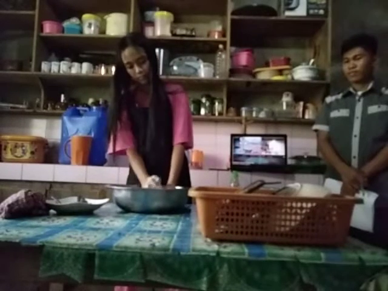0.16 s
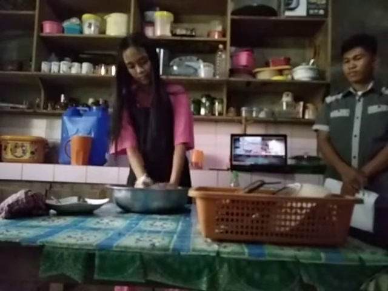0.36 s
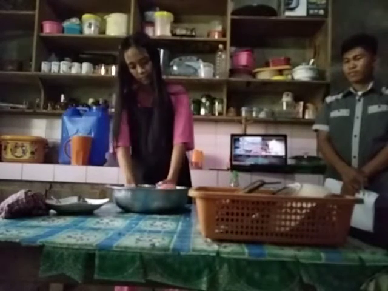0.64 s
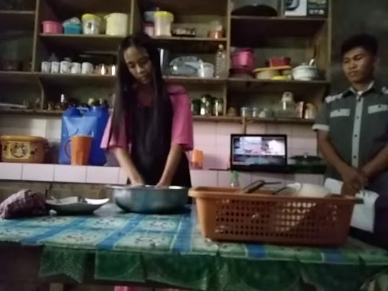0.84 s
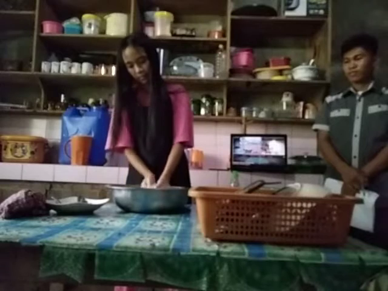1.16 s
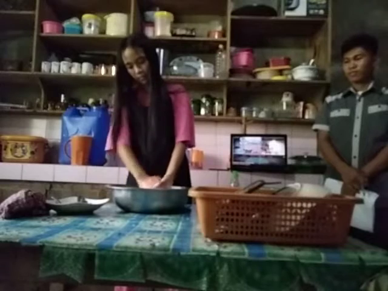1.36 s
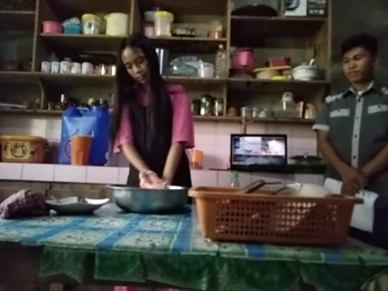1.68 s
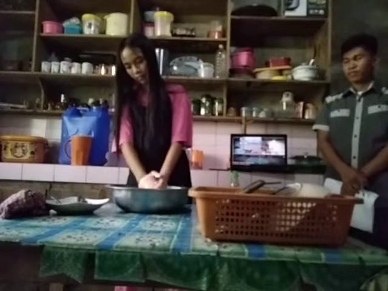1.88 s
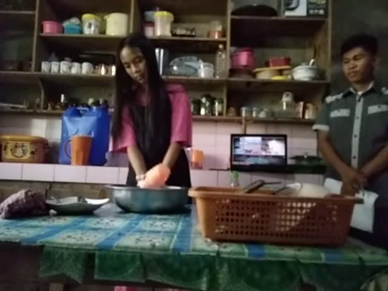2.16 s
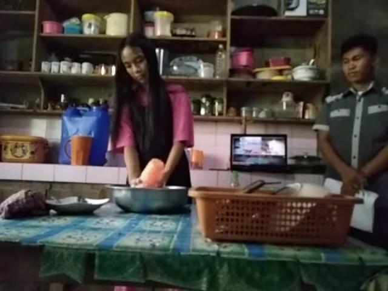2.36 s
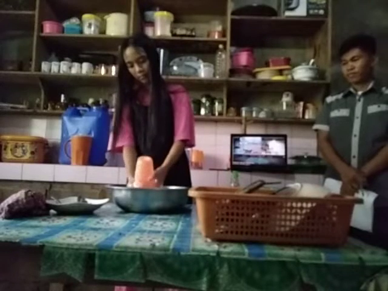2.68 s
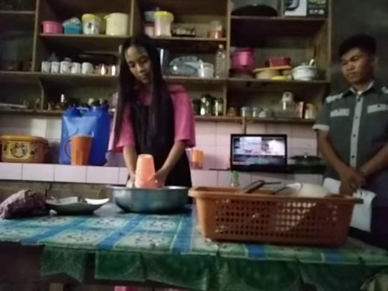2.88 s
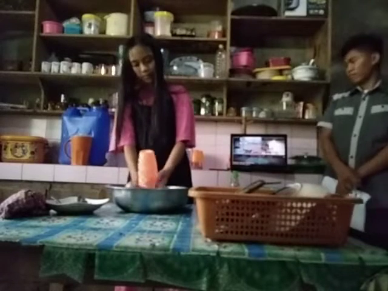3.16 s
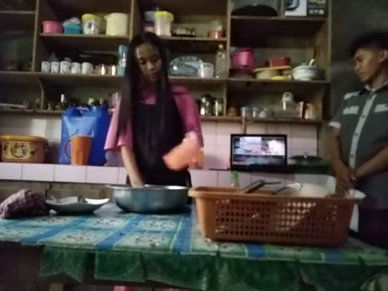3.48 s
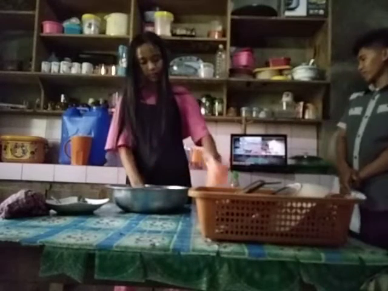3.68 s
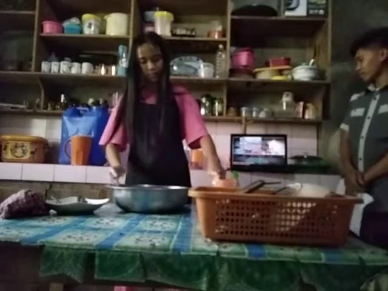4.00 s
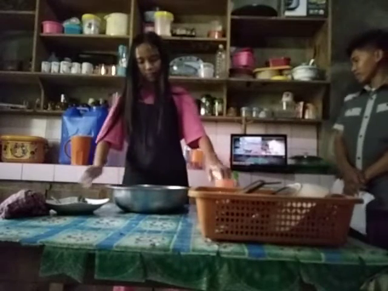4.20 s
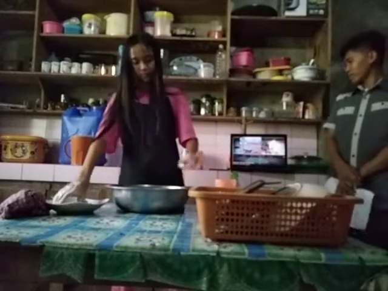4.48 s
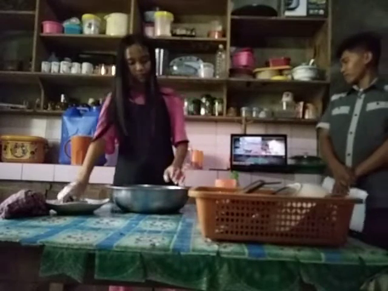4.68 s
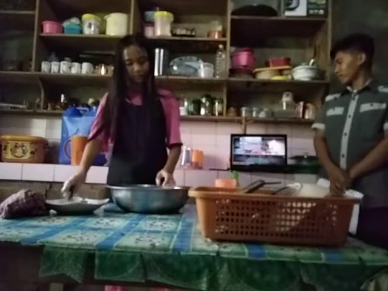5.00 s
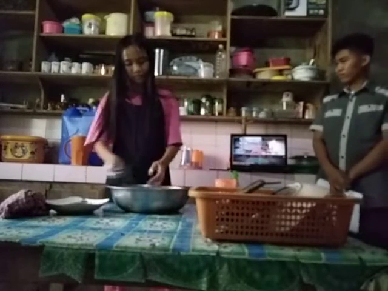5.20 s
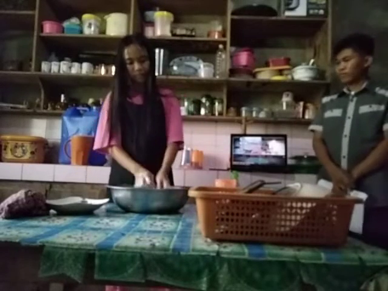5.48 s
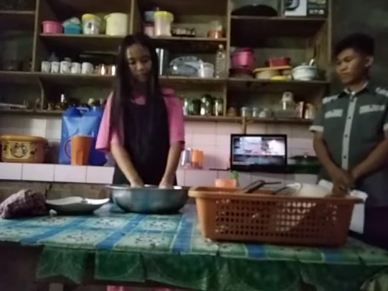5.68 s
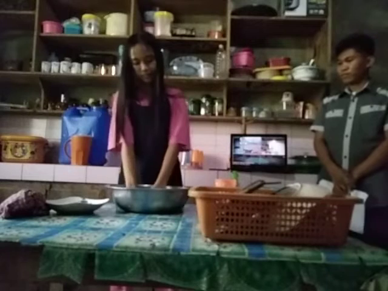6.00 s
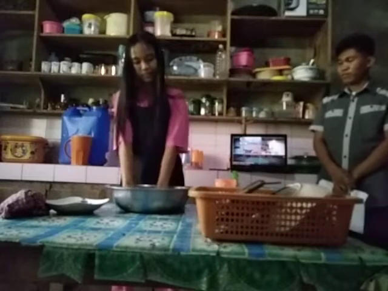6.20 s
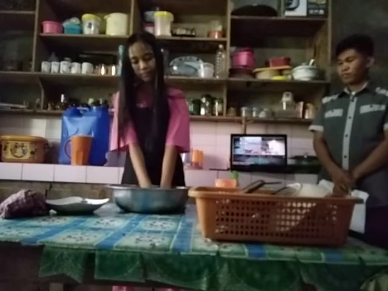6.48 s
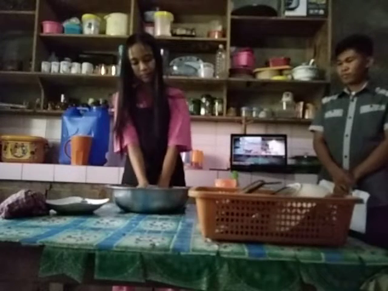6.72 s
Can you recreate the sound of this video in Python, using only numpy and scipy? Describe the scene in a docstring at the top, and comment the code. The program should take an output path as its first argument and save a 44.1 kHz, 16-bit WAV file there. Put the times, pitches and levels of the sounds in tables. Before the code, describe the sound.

A small kitchen with hard walls, heard through one fixed microphone a little way off. A soft low motor drone near 73 Hz, patchy low air noise and faint hiss continue throughout. From 0 to 0.75 s a gecko gives five quiet, rough chirps, about six a second. A wet plastic cup knocks dull and hollow in a steel basin at 0.7 and 0.83 s, then at 1.2 s, with a faint bump at 1.36. From 1.5 to 3.8 s it is nearly quiet, with only very weak bumps and tiny pips. A hollow cup knock comes at 3.9 s. At 4.55-4.95 s cutlery clatters onto plates in a bright, dense, ringing burst, the loudest moment, mixed with steel drags. Spoons drop crisply in the basin around 5.45 s. A faint bump and scrape follow at 5.75, then cup knocks with hard rim taps and light scrapes at 6.1 and 6.4 s, fading to quiet.

```python
"""A plastic cup knocks in a steel basin in a hard-walled kitchen: each blow is a set of short resonances.
Cutlery clatters off plates and spoons drop in the basin as noisy cracks over ringing modes; drags are shaped noise.
A gecko chirps in rough narrow bands near the start; narrow noise pips, mostly faint, are scattered throughout.
Behind lie a far motor of four sine partials, thin tones and patchy noise. Hits and drags get an answer from the walls.
Levels are set ahead of a 2 dB output trim."""
import sys
import numpy as np
from scipy import signal
from scipy.fft import rfft, irfft, next_fast_len
from scipy.io import wavfile
from scipy.ndimage import uniform_filter1d, map_coordinates

SR = 44100
rng = np.random.default_rng(int(sys.argv[2]) if len(sys.argv) > 2 else 0)


def store_wav(level_fs):
    """Save 16-bit WAV to argv[1]."""
    pcm = np.round(np.clip(np.atleast_2d(level_fs), -1, 1) * 32767)
    wavfile.write(sys.argv[1], SR, pcm.T.astype(np.int16))


N = 302085  # samples in the scene
LONG = 2 ** 15  # samples in one hit or room answer
HIT_T = np.arange(LONG) / SR
HIT_HZ = np.fft.rfftfreq(LONG, 1 / SR)


# Cup blows, hollow and thump relative to the wall modes:
# start_s, level_db, thump_db, thump_hz, hollow_hz, hollow_db
CUP_KNOCKS = [(0.026, -46.5, -25, 122, 608, 6), (0.054, -52.5, -12, 121, 534, 18),
              (0.69, -35, -9.5, 406, 733, 5.5), (0.831, -29.5, -13.5, 375, 653, 2),
              (1.185, -33, 6, 145, 555, 2), (1.358, -46, 11, 245, 557, 14.5),
              (2.362, -52.5, 7.5, 127, 630, -1.5), (2.637, -55.5, 16.5, 225, 802, 20),
              (2.785, -53, 5, 230, 1080, -4.5), (3.243, -60, 28, 153, 519, 5.5),
              (3.907, -31.5, 1.5, 354, 566, 17.5), (4.7, -42, 12.5, 323.5, 577, -3.5),
              (5.753, -48.5, -6.5, 222, 451, 0.5), (6.107, -35.5, -2.5, 343, 645, 3),
              (6.373, -39.5, -32, 137, 1092, 9)]
# Modes of the cup wall: pitch_hz, width_hz, level_db
CUP_MODES = [(399, 75, -11), (432, 26, -2.5), (562, 29, 7), (686.4, 4, 5), (765.5, 65, -13.5),
             (888, 280, -7), (1089, 112, -8.5)]
# Hard taps of the rim: start_s, level_db, treble_db, high_mode_db, low_modes_db, top_modes_db
RIM_TAPS = [(1.1819, -46, -37, -9, -6.5, -4), (2.7852, -35, -5, 11, 10, 0.5),
            (6.1034, -31.5, -17.5, -9, -2, -18), (6.3719, -38.5, -13, -22.5, 9, -16)]
# Low modes of the rim: pitch_hz, width_hz, level_db
RIM_LOW_MODES = [(1092, 157, 0.5), (2053, 98, -6.5), (2550, 370, -2.5)]
# Top modes of the rim: pitch_hz, width_hz, level_db
RIM_TOP_MODES = [(5150, 950, -2), (6870, 750, -5), (7830, 490, -1.5)]


def cup():
    """Dull blows excite the wall modes, the air in the cup and a thump; hard taps excite the rim."""
    out = np.zeros(N + LONG)
    soft_contact = 1 / (1 + 1j * HIT_HZ / 1700) ** 4  # wet plastic meets softly: little treble
    for start, level_db, thump_db, thump_hz, hollow_hz, hollow_db in CUP_KNOCKS:
        wall = body(CUP_MODES, HIT_HZ) * peak(HIT_HZ, 800, 1100) ** 2
        hollow = amp(hollow_db) * peak(HIT_HZ, hollow_hz, 73.8) ** 2
        thump = amp(thump_db) * peak(HIT_HZ, thump_hz, 300) ** 3
        add(out, start, level_db, irfft((wall + hollow + thump) * soft_contact), wet_db=3.5)
    for start, level_db, treble_db, high_db, low_db, top_db in RIM_TAPS:
        low = amp(low_db) * rim(RIM_LOW_MODES)
        high = amp(high_db) * peak(HIT_HZ, 3630, 320) ** 2
        treble = amp(treble_db) * peak(HIT_HZ, 5100, 5300) ** 2
        top = amp(top_db) * rim(RIM_TOP_MODES)
        add(out, start, level_db, irfft(low + high + treble + top), wet_db=5.0)
    return out[:N]


def rim(modes):
    """Rim modes as a sum of doubled resonances, which build up less abruptly than single ones."""
    return sum(amp(db) * peak(HIT_HZ, hz, width) ** 2 for hz, width, db in modes)


# Cutlery on plates: start_s, level_db, body_db, ring_db
PLATE_HITS = [(4.565, -43.5, -13.5, 1), (4.582, -15.5, -4.5, -6.2), (4.598, -29.5, -12, -2.5),
              (4.669, -12.5, -24.5, 1.5), (4.6819, -19, 2, 0), (4.7, -20.5, -1.5, 0.5),
              (4.7289, -20.5, -13.5, 1.5), (4.7999, -26, -12, -0.8), (4.9174, -31, -2, -1.5)]
# Colour of a steel contact: frequency_hz, density_db_per_hz
CONTACT_COLOUR = [(240, -65), (400, -23.5), (777, -2.5), (852, -16), (1090, -10.5), (1710, -10.5),
                  (1840, -7.5), (4380, 5.5), (4800, -3.5), (7630, -6.5), (16000, -16.5)]
# Plate modes, t60 as the free ring before its cap and damping: pitch_hz, strength_db, t60_s
PLATE_MODES = [(767, -21.5, .4), (1113, -10, 0.46), (1210, -11, .46), (1395, -17.5, 0.39), (1884, -19, 1.4),
               (3130, -2.5, 0.12), (3320, -5.5, 0.37), (3570, -9.5, 0.36), (3760, -9, 0.62),
               (4410, -0.5, 0.2), (5260, -18, 5.0), (5070, -28, 0.43), (5600, -11.5, 0.34),
               (5800, -8, 0.35), (6260, -3, 0.33), (6960, -14.5, 0.41), (7470, -1, 0.24), (7670, -8, 0.23),
               (8690, -13.5, 0.33), (8900, -23.5, 0.62), (9561, -24.5, 0.84), (10700, -32, 1.2),
               (11850, -9.5, 0.37), (13400, -31.5, 0.96)]


def plates():
    """Cutlery on plates: each contact is a short noisy crack plus a ring of the plate modes."""
    out = np.zeros(N + LONG)
    for start, level_db, body_db, ring_db in PLATE_HITS:
        colour = amp(along(CONTACT_COLOUR, HIT_HZ)) + amp(body_db) * peak(HIT_HZ, 950, 600) ** 2
        plate_ring = amp(ring_db) * ring(PLATE_MODES, damping=0.65, scatter_db=3.0)
        add(out, start, level_db, plate_ring + crack(colour, 0.013, attack=0.0015), wet_db=6)
    return out[:N]


# Spoons dropping in the basin: start_s, level_db
SPOON_DROPS = [(5.434, -34.5), (5.443, -23.5), (5.4557, -28), (5.4811, -30.5)]
# Spoon modes, t60 as the free ring before its cap and damping: pitch_hz, strength_db, t60_s
SPOON_MODES = [(3060, -15, 0.14), (4920, -6.5, .2), (5220, -2.5, 0.22), (5680, -9, .15), (6770, -8.5, 0.33),
               (7330, -4, 0.17), (7430, -19, .2), (8600, -10.5, .2), (9170, -15, .15), (11300, -15, 0.16),
               (11970, -14.5, 0.21), (11200, -12, 0.21)]


def spoons():
    """Spoons dropped in the basin: a bright crack over spoon modes of scattered strength."""
    out = np.zeros(N + LONG)
    for start, level_db in SPOON_DROPS:
        colour = amp(along(SLIDE_COLOUR, HIT_HZ)) + amp(-24.5) * peak(HIT_HZ, 13500, 5000) ** 2
        spoon_ring = 1.2 * ring(SPOON_MODES, damping=1.0, scatter_db=8.0)
        add(out, start, level_db, spoon_ring + crack(colour, 0.025, attack=0.00098), wet_db=7)
    return out[:N]


# Strokes of steel on steel: start_s, rise_s, hold_s, level_db, fade_db_per_s, low_band_db
STROKES = [(4.551, 0.017, 0.072, -37, 199, -3), (4.665, 0.007, .036, -28.5, 288.5, -7),
           (4.75, .02, 0.11, -42.5, 167, -3), (5.738, 0.029, 0.056, -49.5, 297, -27),
           (6.102, 0.0069, 0.023, -40, 470, -9), (6.155, .21, 0.0039, -44.5, 195, -37),
           (6.365, .02, 0.0116, -46.5, 190, -0.5), (6.482, 0.036, 0.0065, -56.5, 272, -36)]
# Colour of sliding steel: frequency_hz, density_db_per_hz
SLIDE_COLOUR = [(1760, -41), (3000, -18), (3220, -18.5), (3600, -11.5), (5670, -1.5), (6440, -5.5),
                (7780, -3.5), (9140, -13), (14900, -33.5), (16000, -44)]
RATTLE_PER_S, RATTLE_DB = 120, -9  # mean rate of tiny knocks, level under the high band


def sliding():
    """Dragged cutlery: gritty noise, coloured by steel and spoon modes, follows each stroke."""
    grit = amp(1.5 * wobble(60) + 2.5 * wobble(350))  # uneven slips
    high = hiss(lambda f: amp(along(SLIDE_COLOUR, f)), patchy_db=2)
    modes = hiss(lambda f: steel(SPOON_MODES, 0.51, 2.1, f), patchy_db=11.5)
    high = unit(grit * (high + 0.13 * modes))
    high = unit(high + amp(RATTLE_DB) * rattle())
    low = unit(grit * hiss(lambda f: peak(f, 2400, 2700) ** 2, patchy_db=1.0))
    out, t = np.zeros(N), np.arange(N) / SR
    for start, rise, hold, level_db, fade, low_db in STROKES:
        fading_s = np.clip(t - start - rise - hold, 0, None)
        stroke = np.clip((t - start) / rise, 0, 1) * amp(level_db - fade * fading_s)
        out += stroke * (high + amp(low_db) * low)
    return out + amp(-5.0) * signal.fftconvolve(out, walls())[:N]


def rattle():
    """Tiny knocks of uneven size at random moments, each a short crack of steel; rms 1."""
    chance, size = rng.random(size=(2, N))
    knocks = (chance < RATTLE_PER_S / SR) * size ** 3
    tick = crack(amp(along(SLIDE_COLOUR, HIT_HZ)), 0.006, attack=0.0002)[:1024]
    return unit(signal.fftconvolve(knocks, tick)[:N])


# Gecko chirps: start_s, level_db, pitch_hz, upper_band_db, middle_bands_db
GECKO_CHIRPS = [(0.0335, -50.5, 2480, -5.5, -24), (0.2094, -51, 2400, 3.5, -32),
                (0.374, -51, 2386, 3.5, -4.5), (0.5443, -52.5, 2234, -13.5, -10.5),
                (0.6888, -55.5, 2193, -7, -10.5)]
THROAT_DB = -6  # two throat lines, the same in every chirp


def gecko():
    """Short rough chirps: a burst of noise through a few narrow bands."""
    out = np.zeros(N + LONG)
    for start, level_db, hz, upper_db, middle_db in GECKO_CHIRPS:
        pitch = peak(HIT_HZ, hz, 133) ** 2
        upper = amp(upper_db) * peak(HIT_HZ, 4966, 270) ** 2
        middle = amp(middle_db) * (peak(HIT_HZ, 3780, 220) ** 2 + peak(HIT_HZ, 4300, 180) ** 2)
        throat = amp(THROAT_DB) * (peak(HIT_HZ, 2687, 98) ** 2 + peak(HIT_HZ, 1642, 63) ** 2)
        colour = pitch + upper + middle + throat
        add(out, start, level_db, crack(colour, 0.057, attack=0.0066), wet_db=3.5)
    return out[:N]


# Single narrow pips: start_s, level_db, pitch_hz
SINGLE_PIPS = [(.695, -71, 6340), (.7, -73, 8660), (0.7194, -69, 2150), (1.5277, -70.5, 5290),
               (1.5794, -71, 4130), (1.8794, -68.5, 2160), (2.289, -71, 2470), (3.3594, -72, 5100),
               (3.8194, -74, 8600), (3.859, -73, 7640), (4.542, -47, 3400), (3.9107, -73.5, 2720),
               (5.2978, -69.5, 2396), (5.3485, -69, 5230), (5.4095, -63.5, 5080), (6.518, -56.5, 4490),
               (6.7994, -64, 4530), (6.804, -76, 9000), (6.812, -73, 7760), (6.816, -63.5, 2910),
               (6.818, -65.5, 3370)]
STRAY_DB, STRAY_HZ = -79.5, 3000  # mean level and middle pitch of the stray pips


def pips():
    """Narrow noise pips at set moments, and 22 faint ones at random moments and pitches."""
    out = np.zeros(N + LONG)
    stray = [(when * N / SR, STRAY_DB + 8 * (size - 0.5), STRAY_HZ * 2.5 ** (pitch - 0.4))
             for when, size, pitch in rng.random(size=(22, 3))]
    for start, level_db, hz in SINGLE_PIPS + stray:
        add(out, start, level_db, crack(peak(HIT_HZ, hz, 140) ** 2, 0.42, attack=0.0044), wet_db=-3.0)
    return out[:N]


# Level of the motor's first partial: time_s, level_db
MOTOR_LEVEL = [(0.0, -52), (0.05, -53), (1.56, -57), (3.3, -60.5), (3.89, -57), (5.02, -60.5), (5.4, -69),
               (5.47, -61.5), (6.6, -58), (6.66, -66), (6.77, -58.5), (6.85, -67)]
# Swells of the upper partials: start_s, length_s, third_db, fifth_db
OVERTONE_SWELLS = [(0.0, 0.95, -81.5, -67.5), (1.0, .56, -72.5, -66), (2.43, 0.57, -64, -84),
                   (2.8, 0.23, -81, -71.5), (3.26, 0.42, -68, -85), (3.68, 0.47, -78, -67),
                   (4.2, 0.752, -87, -65), (5.75, 0.25, -67, -74), (6.1, 0.19, -79.5, -65.5),
                   (6.68, 0.14, -65, -77)]
MOTOR_HZ = 72.73  # mean pitch of the first partial
OCTAVE_DB, OCTAVE_WAVERS_DB = -70, 3  # second partial and its slow wavering
FAINT_DB, FLICKER_DB = -23.5, 2  # third and fifth: floor under the first, quick unevenness
OVERTONE_FADE_S = 0.079


def motor():
    """Four wavering partials of a far motor outside; the third and the fifth come and go."""
    phase = 2 * np.pi * np.cumsum(MOTOR_HZ + 0.5 * wobble(9.5)) / SR
    level_db, = curves(MOTOR_LEVEL)
    flicker = amp(FLICKER_DB * np.array([wobble(18), wobble(16)]))
    third, fifth = (swells(OVERTONE_SWELLS, OVERTONE_FADE_S) + amp(level_db + FAINT_DB)) * flicker
    octave = amp(OCTAVE_DB + OCTAVE_WAVERS_DB * wobble(6.5))
    out = np.zeros(N)
    for k, gain in zip((1, 2, 3, 5), (amp(level_db), octave, third, fifth)):
        wavering = gain * amp(1.2 * wobble(16))
        out += np.sqrt(2) * wavering * np.sin(k * phase + 0.2 * k * wobble(5.8))
    return out


# Centres of the two thin tones: pitch_hz
THIN_HZ = (1686, 2650)
THIN_DB, THIN_WAVERS_DB = (-77.5, -76.5), 3  # start levels, slow wavering
THIN_FADE_DB_S, THIN_END_S = 3.5, 1.27  # fall a second, moment of silence


def thin_tones():
    """Two faint narrow bands of noise that waver and fade out early in the scene."""
    t = np.arange(N) / SR
    fade = amp(-THIN_FADE_DB_S * t) * np.clip((THIN_END_S - t) / 0.18, 0, 1)
    out = np.zeros(N)
    for level_db, hz in zip(THIN_DB, THIN_HZ):
        wavering = amp(level_db + THIN_WAVERS_DB * wobble(2.8))
        out += fade * wavering * hiss(lambda f: peak(f, hz, 150) ** 2, patchy_db=4.0)
    return out


# Level of the kitchen's low noise: time_s, level_db
AIR_LEVEL = [(0.0, -58), (0.8, -60.5), (2.2, -66), (3.5, -64), (4.7, -64.5), (5.1, -68), (5.95, -62),
             (6.85, -60)]
# Colour of the low noise: frequency_hz, density_db_per_hz
AIR_COLOUR = [(10, -21), (27, -2), (40, -7), (90, 2), (150, -1), (200, -11), (400, -13.5), (800, -21.5),
              (1500, -33), (3000, -51)]
# Swells of the two fuzzy tones: start_s, length_s, low_db, high_db
FUZZY_SWELLS = [(0.11, 0.23, -68.5, -78), (1.296, 0.42, -69.5, -79.5), (1.79, 0.21, -66, -75),
                (2.096, 0.18, -69.5, -71), (2.38, 0.23, -68, -76), (2.916, 0.21, -86, -75),
                (3.32, 0.17, -68, -80), (3.585, 0.14, -73, -95), (4.11, 0.37, -74, -84.5),
                (5.265, .14, -69, -81), (5.4, 0.1, -98, -76), (5.543, .16, -70.5, -90),
                (5.93, 0.13, -76, -74), (6.748, .12, -78, -69)]
# Centres of the low and the high fuzzy tone: pitch_hz
FUZZY_HZ = (517, 1045)
# Colour of the microphone hiss: frequency_hz, density_db_per_hz
MIC_HISS_COLOUR = [(600, -26.5), (1200, 0), (2500, -3.5), (7500, -11.5), (9500, -20), (16000, -36)]
FUZZY_FADE_S = 0.12


def background():
    """Patchy low noise, two fuzzy tones that swell, and microphone hiss of steady mean level."""
    level_db, = curves(AIR_LEVEL)
    out = amp(level_db) * hiss(lambda f: amp(along(AIR_COLOUR, f)), patchy_db=4.5)
    for gain, hz in zip(swells(FUZZY_SWELLS, FUZZY_FADE_S), FUZZY_HZ):
        out += (gain + amp(-85.5)) * hiss(lambda f: peak(f, hz, 82) ** 2, patchy_db=4.0)
    return out + amp(-79) * hiss(lambda f: amp(along(MIC_HISS_COLOUR, f)), patchy_db=4.0)


# Reverberation of the hard walls: frequency_hz, t60_s
WALL_DECAY = [(150, 0.56), (1000, 0.38), (5000, 0.29), (14000, 0.27)]


def walls():
    """A new room answer of energy 1: noise that swells in over about 10 ms, then dies by frequency."""
    hz, t, z = signal.stft(rng.standard_normal(LONG), SR, nperseg=256)
    decay = amp(-60 * t / along(WALL_DECAY, hz)[:, None])
    tail = signal.istft(z * decay, SR, nperseg=256)[1][:LONG]
    tail *= 1 - np.exp(-(HIT_T / 0.0059) ** 2)
    return tail / np.linalg.norm(tail)


def add(out, start, level_db, sound, wet_db):
    """Puts a sound of direct peak level_db at start, with its own answer from the walls."""
    sound = sound[:LONG // 2] / np.abs(sound).max()
    wet = signal.fftconvolve(sound, walls())[:LONG]
    first = round(start * SR)
    out[first:][:LONG // 2] += amp(level_db) * sound
    out[first:][:LONG] += amp(level_db + wet_db) * wet


def crack(colour, t60, attack):
    """Coloured contact noise that dies away; t60 and attack in seconds."""
    noise = unit(irfft(colour * rfft(rng.standard_normal(LONG))))
    return noise * amp(-60 * HIT_T / t60) * (1 - np.exp(-HIT_T / attack))


def ring(modes, damping, scatter_db):
    """The modes after one sharp blow, peak 1."""
    sound = irfft(steel(modes, damping, scatter_db, HIT_HZ))
    return sound / np.abs(sound).max()


def steel(modes, damping, scatter_db, f):
    """Modes at new strengths and slightly new pitch; a grip or the water widens them, the high ones most."""
    levels, shifts = rng.standard_normal((2, len(modes)))
    struck = []
    for (hz, db, t60), level, shift in zip(modes, levels, shifts):
        free_width = np.log(1000) / (np.pi * min(t60, 0.3))  # width in Hz for that t60
        width = (1.5 + hz / 2200) * free_width / damping
        # a wide resonance starts louder: dividing by its width evens that out
        struck.append((hz * (1 + 0.0091 * shift), width, db + scatter_db * level - 20 * np.log10(width)))
    return body(struck, f)


def body(modes, f):
    """A sum of resonances of alternating sign."""
    return sum((-1) ** k * amp(db) * peak(f, hz, width) for k, (hz, width, db) in enumerate(modes))


def peak(f, hz, width_hz):
    """One causal resonance, gain 1 at its centre."""
    return 1j * f * width_hz / (hz * hz - f * f + 1j * f * width_hz)


def hiss(response, patchy_db):
    """Filtered noise of rms 1 with patches of random gain over time and frequency."""
    z = signal.stft(rng.standard_normal(N), nperseg=1024)[2]
    field = uniform_filter1d(uniform_filter1d(rng.standard_normal(z.shape), 3, 0), 6, 1)
    patchy = signal.istft(z * amp(patchy_db * unit(field)), nperseg=1024)[1][:N]
    return unit(filtered(patchy, response))


def filtered(x, response):
    """x times a response of frequency."""
    m = next_fast_len(len(x) + 8192)
    return irfft(rfft(x, m) * response(np.fft.rfftfreq(m, 1 / SR)), m)[:len(x)]


def swells(rows, fade_s):
    """Gain curves, one for each dB column: every swell fades in, holds and fades out."""
    t, gains = np.arange(N) / SR, 0
    for start, length, *levels_db in rows:
        to_edge = np.minimum(t - start, start + length - t)
        gains = gains + amp(levels_db)[:, None] * np.clip(to_edge / fade_s + 0.5, 0, 1) ** 2
    return gains


def curves(rows):
    """One value per sample for each column after the time."""
    s, *cols = np.transpose(rows)
    return [np.interp(np.arange(N) / SR, s, c) for c in cols]


def wobble(rate):
    """A smooth random curve, rate knots a second."""
    return map_coordinates(rng.standard_normal(int(N * rate / SR) + 4), [np.arange(N) * rate / SR])


def along(points, hz):
    """Reads (Hz, value) points on a log frequency axis."""
    f, v = np.transpose(points)
    return np.interp(np.log(hz + 1), np.log(f + 1), v)


def amp(db):
    """dB to gain."""
    return 10 ** (np.asarray(db) / 20)


def unit(x):
    """Scaled to rms 1."""
    return x / np.sqrt(np.mean(x ** 2) + 1e-20)


def scene():
    """Everything at the one microphone."""
    hits = cup() + plates() + spoons() + sliding()
    return (hits + gecko() + pips() + motor() + thin_tones() + background())[None]


def record(dry):
    """A 2 dB trim and a steep cut of everything from 15.7 kHz up."""
    return filtered(amp(-2) * dry[0], lambda f: f < 15700)[None]


dry = scene()
out = record(dry)
store_wav(out)
```